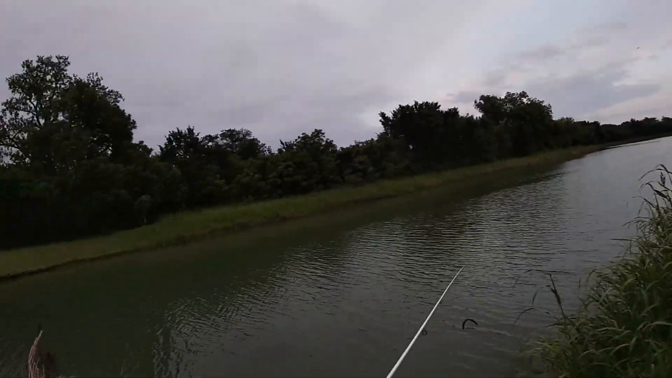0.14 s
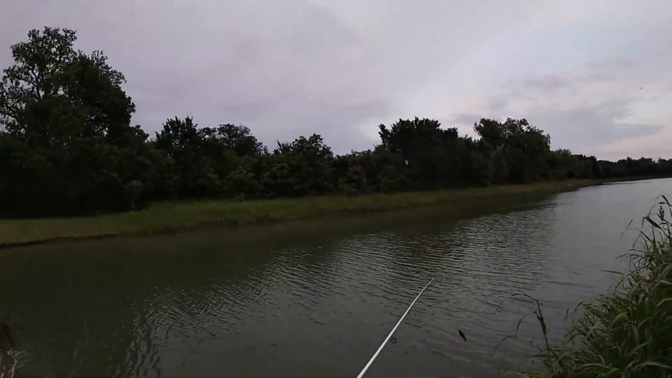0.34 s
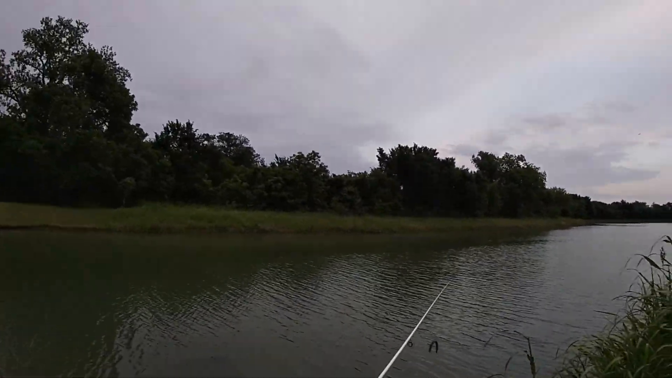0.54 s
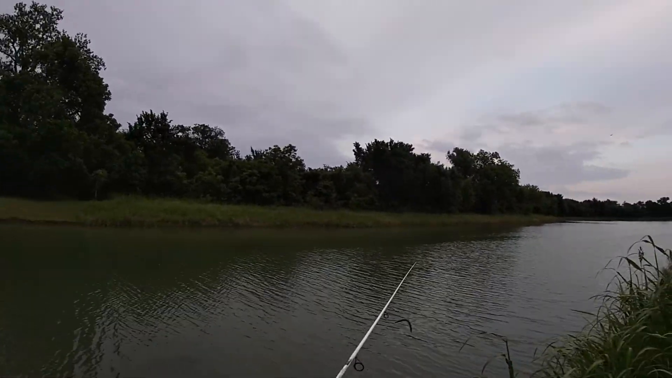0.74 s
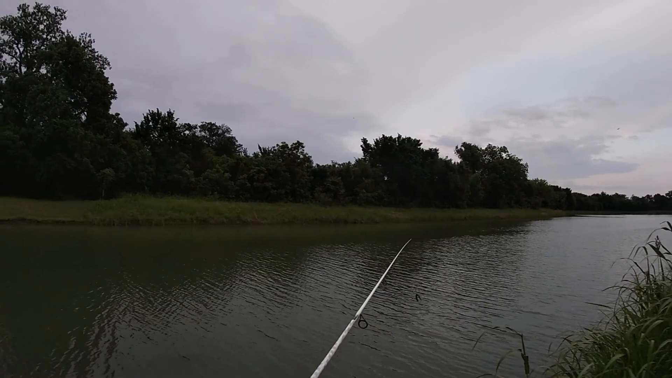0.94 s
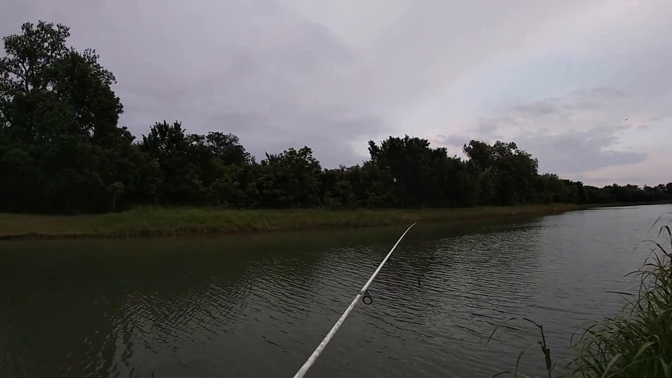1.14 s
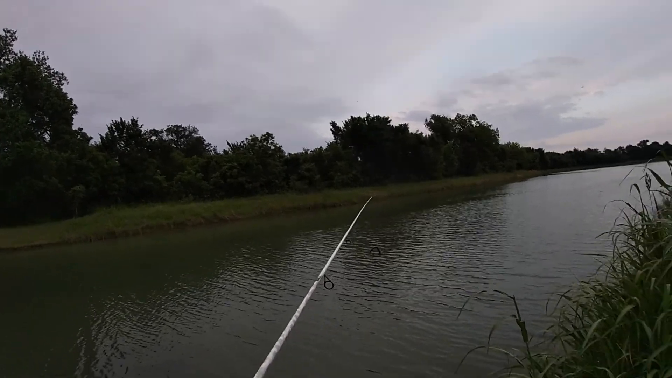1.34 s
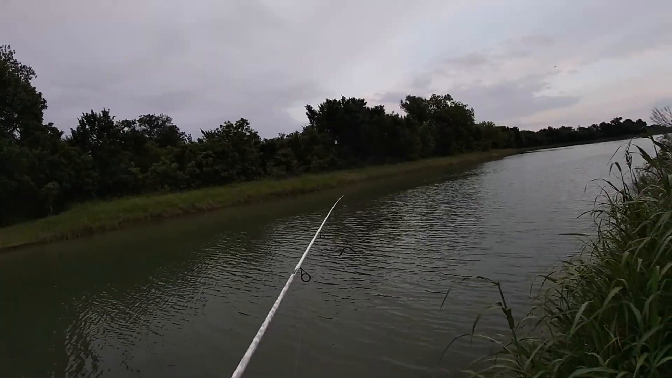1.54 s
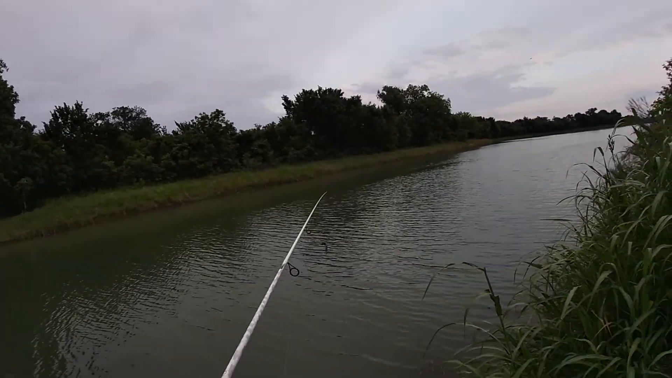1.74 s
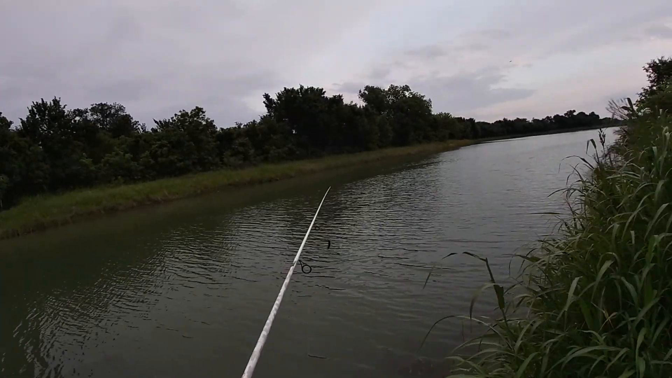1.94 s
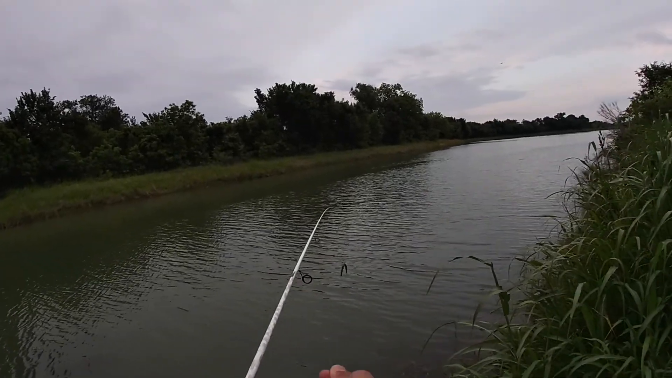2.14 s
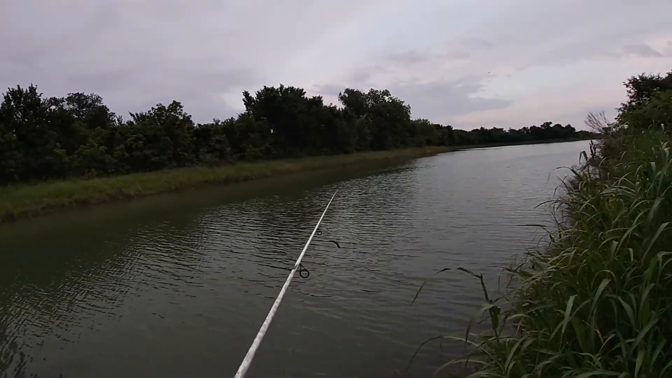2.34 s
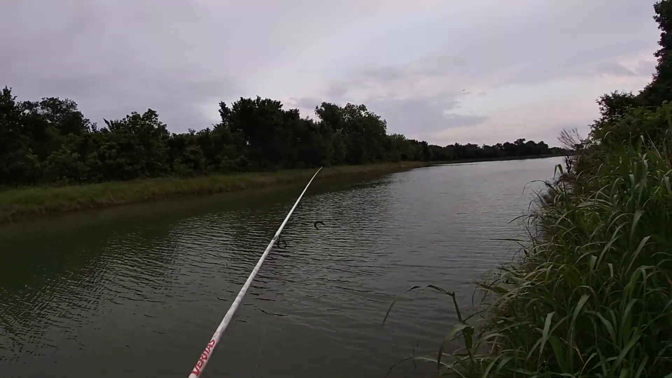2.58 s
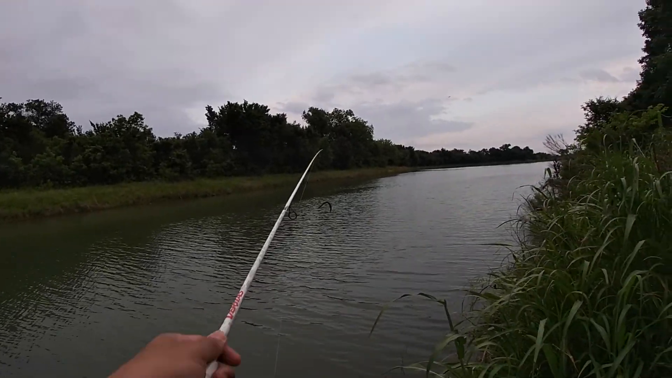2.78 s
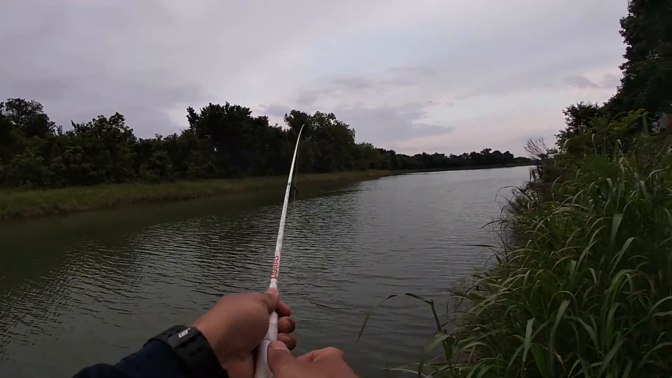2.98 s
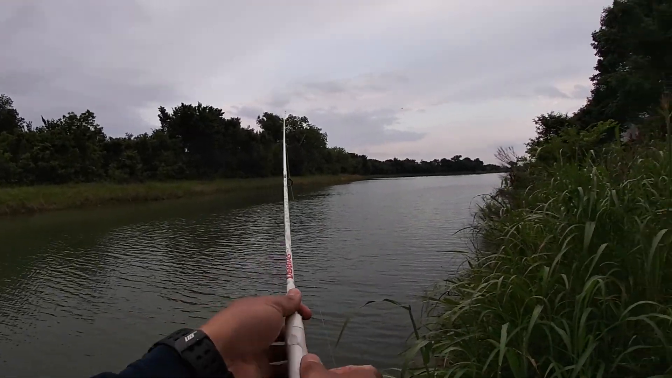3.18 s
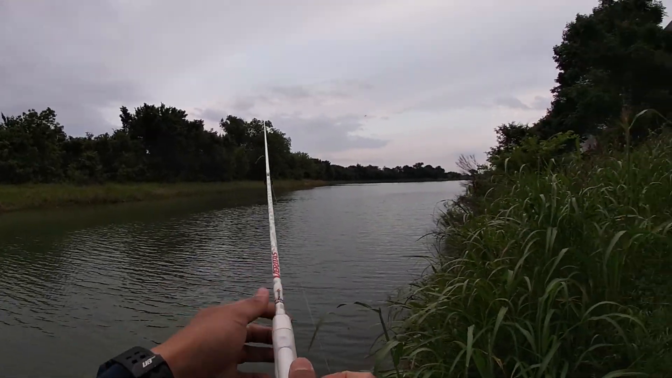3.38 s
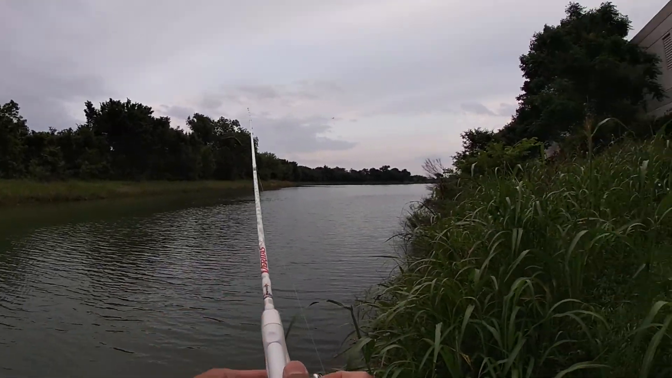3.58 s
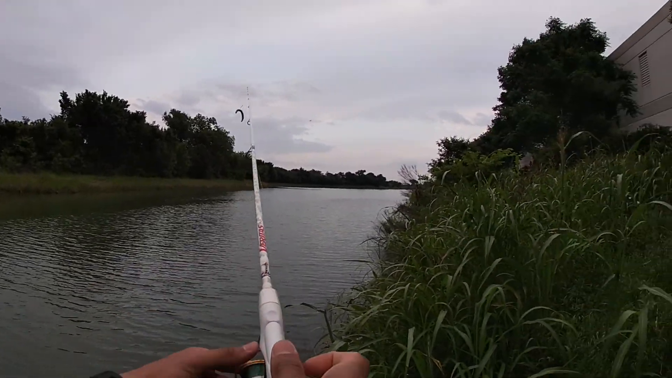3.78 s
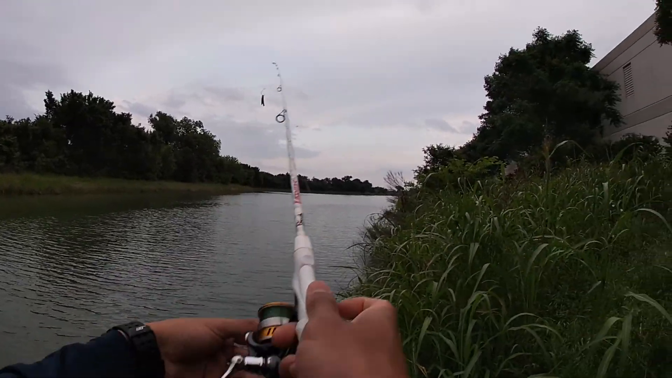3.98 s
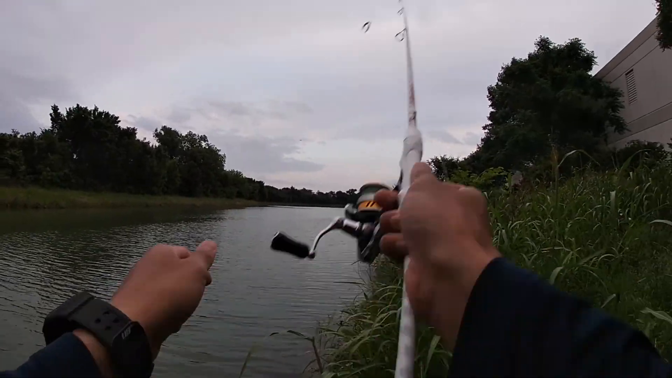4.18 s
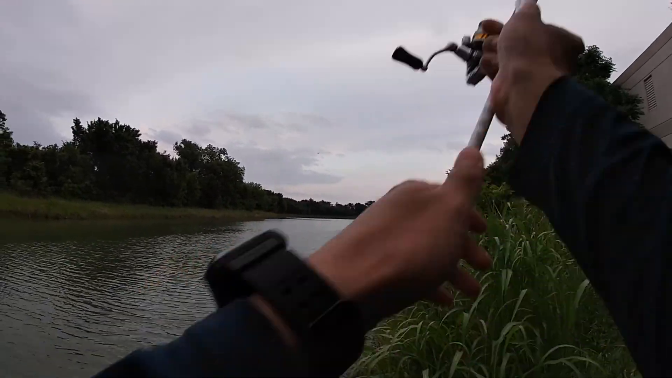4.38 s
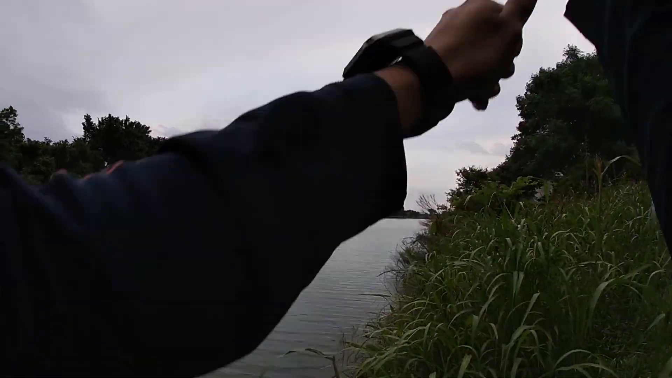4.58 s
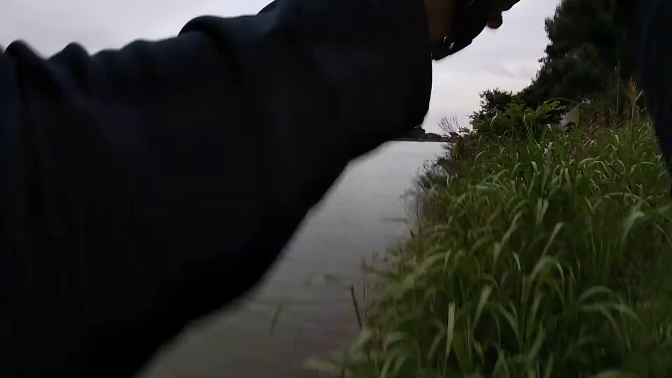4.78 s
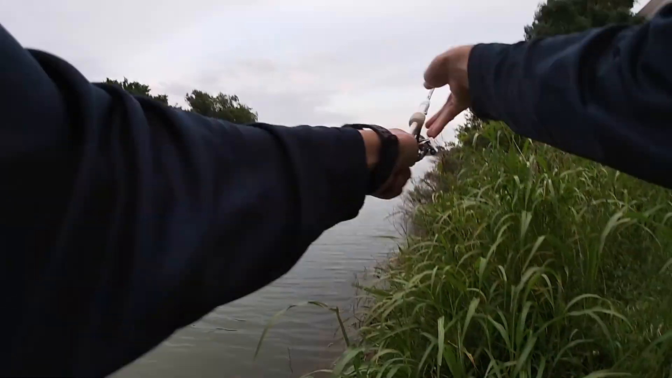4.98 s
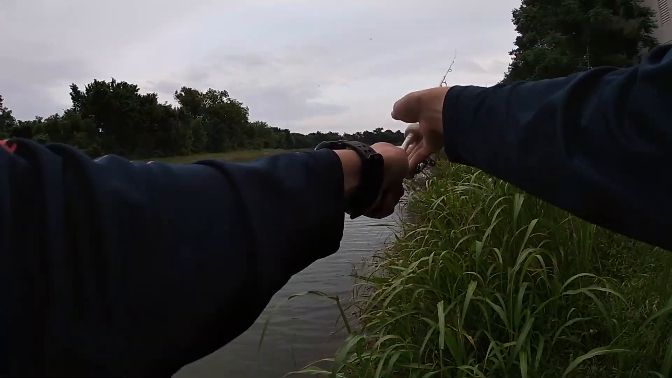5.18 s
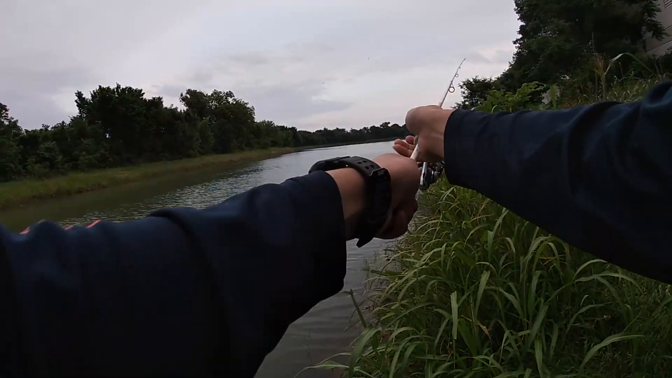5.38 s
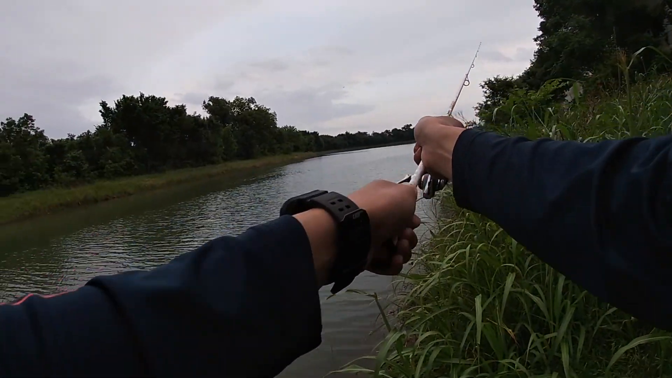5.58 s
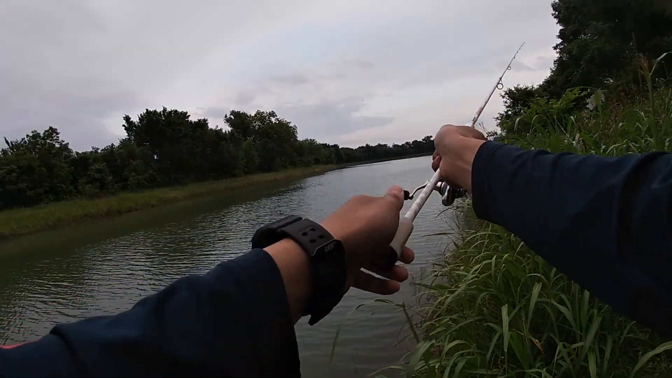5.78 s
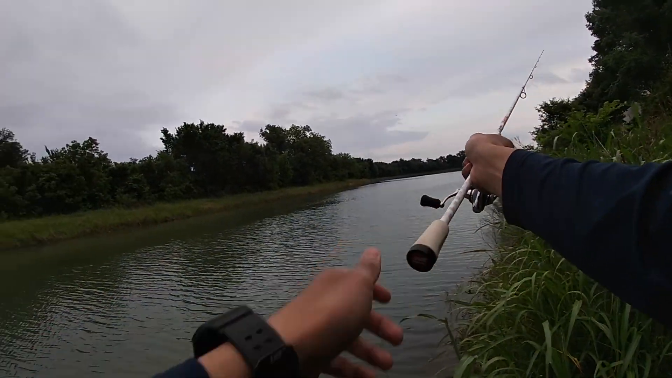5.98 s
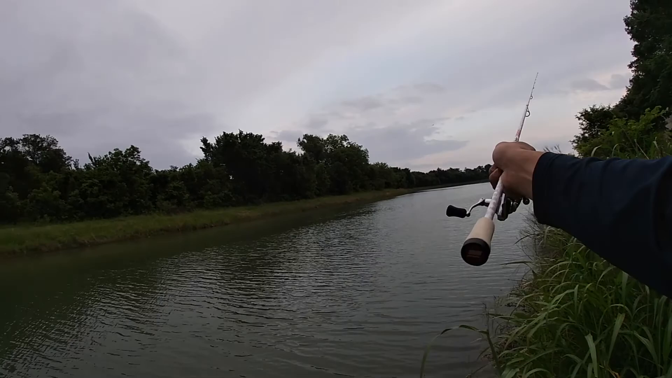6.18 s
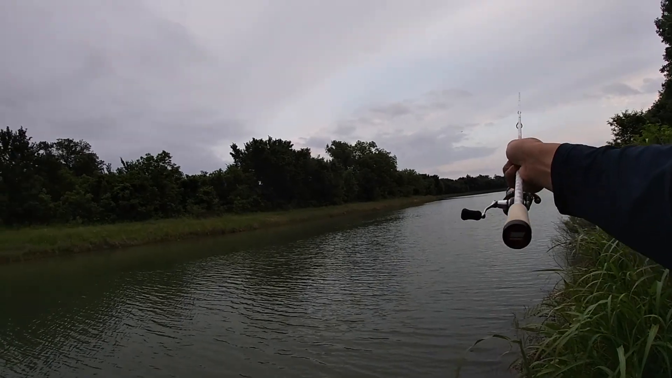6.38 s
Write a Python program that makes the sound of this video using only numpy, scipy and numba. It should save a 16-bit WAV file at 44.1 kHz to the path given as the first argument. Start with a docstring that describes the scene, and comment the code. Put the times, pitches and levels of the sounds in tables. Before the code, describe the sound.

A distant road rumbles steadily beside a canal, with faint engine hums and a few low wind puffs on a body-worn microphone. A fishing reel gives a quick run of small clicks, and sleeves rustle faintly. Late on, the cast shakes the microphone with a deep thump, the rod swishes, and line flutters off the spool, its thin whistle falling as it fades.

```python
"""A fishing rod cast from a grassy canal bank, heard by a chest-mounted camera.
A distant road rumbles, wind puffs on the microphone, sleeves rustle, and the reel clicks, whirrs
and squeaks. Then the throw shakes the camera mount, the rod swishes through the air and the line
hisses off the spool, slapping the rod rings coil by coil, its whistle falling as the lure slows."""
import sys
import numpy as np
from scipy import signal
from scipy.io import wavfile
from scipy.ndimage import uniform_filter1d
from numba import njit

SR = 44100
rng = np.random.default_rng(int(sys.argv[2]) if len(sys.argv) > 2 else 0)


def unload_audio(sound):
    """Save the sound as a 16-bit wav file, at the path given as the first command line argument."""
    columns = np.transpose(np.atleast_2d(sound))
    # keep every value between -1 and 1, then stretch to whole-number steps
    steps = np.round(np.clip(columns, -1, 1) * 32767)
    wavfile.write(sys.argv[1], SR, steps.astype(np.int16))


N = 283563


def undb(db):
    """Decibels to gain."""
    return np.exp(np.asarray(db) * (np.log(10) / 20))


def unit(x):
    """Scale to rms 1."""
    return x / np.sqrt(np.mean(x ** 2))


def curves(table):
    """Columns of a breakpoint table at every sample, and a soft gate over its span."""
    times, *columns = np.transpose(table)
    t = np.arange(N) / SR
    since_start = t - times[0] + (times[0] == 0)  # no fade at the scene's own edges
    until_end = times[-1] - t + (times[-1] > N / SR - .02)
    gate = np.clip(np.minimum(since_start, until_end) / .02, 0, 1)
    return [np.interp(t, times, column) for column in columns] + [gate]


def swell(peak_s, db, rise_db_s, fall_db_s, hold_s=0):
    """Envelope that climbs to db, holds and falls away, both slopes straight in dB."""
    t = np.arange(N) / SR - peak_s
    return undb(db + rise_db_s * np.minimum(t, 0) - fall_db_s * np.maximum(t - hold_s, 0))


@njit
def resonator(x, hz, width_hz):
    """State-variable band-pass with a moving centre, gain 1 at the centre."""
    out = np.empty(len(x))
    band_state, low_state, tuning, damping, last_hz = 0., 0., 0., 0., 0.
    for i in range(len(x)):
        if hz[i] != last_hz:
            last_hz = hz[i]
            tuning, damping = np.tan(np.pi * hz[i] / SR), width_hz / hz[i]
        ring = (band_state + tuning * (x[i] + 1e-18 - low_state)) / (1 + tuning * (tuning + damping))
        band_state = 2 * ring - band_state
        low_state += 2 * tuning * ring
        out[i] = damping * ring
    return out


def band(x, hz, width_hz):
    """Steep band-pass: the resonator applied twice."""
    hz = np.clip(hz + np.zeros(len(x)), 10, .45 * SR)
    return resonator(resonator(x, hz, float(width_hz)), hz, float(width_hz))


def noise_band(hz, width_hz):
    """Band of smooth noise at rms 1."""
    return unit(band(rng.standard_normal(N), hz, width_hz))


def wander(rate_hz):
    """Random steps, smoothed twice, at rms 1."""
    hold = int(SR / rate_hz)
    steps = np.repeat(rng.standard_normal(N // hold + 1), hold)
    return unit(uniform_filter1d(uniform_filter1d(steps, hold), hold)[:N])


def grit(scatter_db):
    """Grainy noise with uneven sample sizes, as from many tiny snaps."""
    return unit(rng.standard_normal(N) * undb(scatter_db * np.minimum(rng.exponential(size=N), 5.)))


def hiss(bands, scatter_db, flicker_db):
    """Grit through a set of resonances, each flickering alone."""
    return unit(sum(undb(db + flicker_db * wander(30)) * unit(band(grit(scatter_db), hz, width))
                    for hz, width, db in bands))


# Traffic swells; each level counts only against its own average:
# time_s, rumble_db, drone_db, low_roar_db, high_roar_db, tyre_hiss_db, thin_hiss_db
ROAD_SWELLS = [(0, -31.5, -30.5, -44.5, -50.5, -61, -59), (.65, -38, -31, -44, -51, -63.5, -60.5),
               (1.15, -34.5, -31, -41, -46, -58, -54), (1.7, -41, -32, -40, -46, -54.5, -53.5),
               (1.95, -40, -30, -35.5, -43.5, -57, -52.5), (2.5, -42.5, -29.5, -41, -43.5, -54, -52),
               (2.8, -37.5, -30, -38, -44, -52.5, -51), (3.05, -42, -32.5, -40, -46.5, -54, -56.5),
               (4.0, -40, -33.5, -40, -44.5, -53.5, -65.5), (4.3, -34.5, -33.5, -41, -44, -54.5, -53),
               (4.6, -40.5, -32, -39, -45, -53.5, -58), (4.9, -35.5, -36, -40, -45, -56, -57.5),
               (5.2, -40.5, -36, -40.5, -44, -55, -55.5), (5.5, -39, -37, -39, -44, -53, -59),
               (6.43, -40.5, -36, -40.5, -42, -51.5, -53.5)]
# The road's bass-heavy spectrum: frequency_hz, relative_density_db
ROAD_SPECTRUM = [(20, -8), (80, -2), (120, -2.5), (160, -0.5), (250, -7), (380, -13.5), (480, -9.5),
                 (700, -15.5), (1230, -20), (1600, -26), (2100, -34.5), (2700, -40.5), (3400, -69),
                 (6500, -84)]
def road(level_db=-30.5):
    """Third-octave bands of noise; rumble, drone, roar and hiss swell apart as vehicles come and go."""
    swells_db = np.array(curves(ROAD_SWELLS)[:-1])
    swells_db -= swells_db.mean(axis=1, keepdims=True)
    spectrum_hz, density_db = np.transpose(ROAD_SPECTRUM)
    crossovers_hz = [130, 420, 800, 1600, 2300]
    out = 0
    for hz in 20 * 2 ** np.arange(0, 8.7, 1 / 3):
        band_db = np.interp(np.log(hz), np.log(spectrum_hz), density_db) + 10 * np.log10(hz)
        swell_db = swells_db[np.searchsorted(crossovers_hz, hz)]
        out += undb(band_db + swell_db + .72 * wander(6)) * noise_band(hz, hz / 3)
    return undb(level_db) * unit(out)


def far_tone(table, width_hz):
    """A far tone: partly steady, partly scattered by the air into a narrow fluttering band."""
    hz, db, gate = curves(table)
    phase = 2 * np.pi * np.cumsum(hz + 3.512 * wander(22.01)) / SR
    steady = np.sqrt(2) * np.sin(phase + rng.uniform(0, 2 * np.pi))
    scattered = noise_band(hz, width_hz)
    return gate * undb(db + wander(18)) * (.63 * steady + .53 * scattered)


# Hum of a far engine drawing away: time_s, gain_db
ENGINE_HUM = [(0, -27.5), (.3, -37.5), (.48, -37), (.75, -36.5), (1.2, -29.5), (1.4, -36), (1.58, -26.5),
              (1.82, -37.5), (1.95, -36), (2.24, -43), (2.36, -32.5), (2.9, -33), (3.3, -37), (4.0, -37.5),
              (4.7, -36.5), (5.15, -45.5), (5.6, -36.5), (6.43, -43.5)]
# Tones of passing vehicles: start_s, length_s, start_pitch_hz, climb_hz_per_s, middle_gain_db
PASSING_TONES = [(1.39, 0.12, 472, -5.5, -38), (2.054, 0.62, 473.3, 0, -36.5), (2.795, 0.23, 484, 0, -43),
                 (1.999, 1.52, 312, 71.5, -41), (3.954, 0.77, 499, -7.5, -38.5),
                 (5.148, 0.74, 487.3, 30, -41), (5.4, 1.3, 337.8, 34.5, -43)]
# An engine revving up and letting off: time_s, pitch_hz, gain_db
ENGINE_REV = [(3.2, 197.4, -35), (3.5, 208.4, -30), (4.05, 225.3, -32), (4.35, 213.6, -32.5),
              (4.8, 178.3, -43)]
def vehicles(hum_hz=163.6, hum_sag_hz_s=3., edge_db=-3.5):
    """Far engines: a sagging hum, one rev, and passing tones that are softer at their ends."""
    hum = [(s, hum_hz - hum_sag_hz_s * s, db) for s, db in ENGINE_HUM]
    out = far_tone(hum, width_hz=35) + far_tone(ENGINE_REV, width_hz=9.5)
    for start_s, length_s, hz, climb, db in PASSING_TONES:
        arc = [(start_s + share * length_s, hz + climb * share * length_s, db + dip_db)
               for share, dip_db in [(0, edge_db), (.5, 0), (1, edge_db)]]
        out += far_tone(arc, width_hz=21)
    return out


# Wind bumping the microphone: peak_s, level_db, centre_hz
WIND_PUFFS = [(.02, -30, 50.6), (.23, -24.5, 85), (.45, -28.5, 34.8), (1.19, -32, 45), (1.27, -35, 60),
              (1.45, -28.5, 70), (2.1, -39, 50), (2.43, -31.5, 90.5), (2.77, -25.5, 55), (4.25, -35, 69.5),
              (4.98, -28, 22)]
def wind():
    """Each puff on the microphone is a short swell of deep noise."""
    return sum(swell(s, db, rise_db_s=297.5, fall_db_s=179) * noise_band(hz, 1.2 * hz)
               for s, db, hz in WIND_PUFFS)


# Faint bed of rustle: time_s, dull_db, bright_db
CLOTH_BED = [(0, -94.5, -104), (.6, -86, -96), (1.7, -70.5, -89), (2.4, -74.5, -94.5), (3.0, -76, -81.5),
             (3.8, -87, -78.5), (4.0, -73.5, -75), (4.7, -69.5, -68.5), (4.85, -64, -71), (5.3, -79, -62),
             (5.6, -67.5, -68.5), (6.1, -68.5, -71), (6.43, -68, -70.5)]
# Single rubs of cloth and grass: start_s, hold_s, dull_db, bright_db
CLOTH_RUBS = [(.235, 0.034, -68, -92), (.315, .03, -80, -92), (.37, .03, -74, -95), (.42, 0.039, -69, -88),
              (.8, 0.054, -78, -92.5), (1.15, 0.049, -75, -87.5), (1.43, 0.065, -76.5, -87.5),
              (1.87, 0.23, -75, -85), (2.47, 0.052, -73, -89), (2.7, 0.14, -67, -80),
              (3.559, 0.055, -75, -80.5), (3.9, .04, -73, -74), (4.3, 0.083, -66.5, -68.5),
              (4.42, .09, -74, -79)]
# Colour of the dull rustle: centre_hz, width_hz, gain_db
DULL_BANDS = [(3200, 2000, 8), (4500, 2100, 2.5), (5700, 1200, -8.5), (8000, 12000, -13), (11500, 7100, -7)]
# Colour of the bright sleeve hiss: centre_hz, width_hz, gain_db
BRIGHT_BANDS = [(8000, 2000, -1.5), (9900, 1200, -6), (6940, 6900, 0)]
def rustle(rise_db_s=1101, fall_db_s=133.5, snaps_per_s=60):
    """Fibres slip in small jerks that all bands share, with tiny snaps scattered on top."""
    dull_bed_db, bright_bed_db, _ = curves(CLOTH_BED)
    dull_gain, bright_gain = undb(dull_bed_db), undb(bright_bed_db)
    for start_s, hold_s, dull_db, bright_db in CLOTH_RUBS:
        dull_gain += swell(start_s, dull_db, rise_db_s, fall_db_s, hold_s)
        bright_gain += swell(start_s, bright_db, rise_db_s, fall_db_s, hold_s)
    jerks = undb(1.3 * wander(35))
    snaps = (rng.uniform(size=N) < snaps_per_s / SR) * undb(4 * rng.standard_normal(N))
    crackle = undb(-10.5) * dull_gain * unit(band(snaps, hz=4200, width_hz=3500))
    dull = dull_gain * hiss(DULL_BANDS, scatter_db=6.6, flicker_db=.88)
    bright = bright_gain * hiss(BRIGHT_BANDS, scatter_db=2.7, flicker_db=1.1)
    return crackle + jerks * (dull + bright)


def snap(rise_s):
    """A short burst of noise that swells and dies."""
    age = np.arange(int(.03 * SR)) / SR / rise_s
    return rng.standard_normal(len(age)) * age * np.exp(-age)


# Small ticks of tackle: start_s, peak_db, centre_hz, width_hz
TACKLE_TICKS = [(.139, -65, 4000, 2000), (.226, -64, 4000, 4000), (.315, -59, 3500, 2000),
                (.52, -64, 4500, 4000), (1.171, -59, 4500, 3000), (1.195, -50, 4000, 1200),
                (1.268, -55, 4000, 2000), (1.429, -57, 4500, 4000), (2.005, -58, 5600, 900),
                (2.028, -64, 10000, 4000), (2.18, -58, 5000, 3020), (2.222, -57, 3400, 1200),
                (2.476, -57, 5500, 3000), (2.533, -55, 5000, 4000), (3.074, -50, 6400, 3000),
                (3.163, -54, 8500, 4000), (3.912, -48, 8000, 4000), (3.918, -55, 9500, 6000),
                (3.982, -58, 9000, 6000), (4.048, -46, 4000, 3000), (4.055, -55, 8500, 4000),
                (4.078, -50, 5000, 5000), (4.114, -56, 9500, 3000), (4.121, -53, 6950, 5020),
                (4.362, -56, 10000, 6000), (4.415, -37, 6500, 6000), (4.752, -62, 11500, 4000),
                (4.545, -51, 9800, 2000), (4.786, -47, 8000, 8000), (4.802, -44, 6500, 3000),
                (4.829, -30, 1600, 1200), (5.093, -37, 2680, 500), (5.132, -43, 4300, 1200),
                (5.776, -59, 9000, 5040), (5.831, -55, 10000, 4000), (5.861, -59, 9500, 4000),
                (5.942, -53, 10000, 3000), (6.22, -44, 5000, 4000)]
# Clicks of the reel's pawl: start_s, peak_db
PAWL_CLICKS = [(2.0143, -39.5), (2.062, -42), (2.0971, -40.5), (2.129, -41), (2.1575, -41), (2.1684, -53)]
# Resonances of the reel body: centre_hz, width_hz, gain_db
REEL_MODES = [(4430, 280, -2.5), (5320, 400, -3), (5700, 500, -2), (6960, 480, 3.5), (9300, 720, -8),
              (10400, 1400, -3), (13000, 3000, -15), (4500, 3400, -9)]
def clicks():
    """Pawl clicks ring the reel body; tackle ticks each have one broad colour."""
    hits = [(s, db, REEL_MODES, snap(.00027) + .08 * snap(.0013)) for s, db in PAWL_CLICKS]
    hits += [(s, db, [(hz, width, 0)], snap(.0004)) for s, db, hz, width in TACKLE_TICKS]
    out = np.zeros(N)
    for start_s, peak_db, modes, strike in hits:
        hit = sum(undb(db) * unit(band(strike, hz, width)) for hz, width, db in modes)
        start = int(start_s * SR)
        out[start:start + len(hit)] += undb(peak_db) * hit / np.abs(hit).max()
    return out


# A brief turn of the reel handle: start_s, hold_s, level_db
HANDLE_TURNS = [(.89, 0.027, -84)]
def reel_whirr(centre_hz=5800):
    """Gear teeth blur into a narrow hiss, joined for a moment by a band nearly an octave up."""
    winding = swell(peak_s=2.2, db=-76, rise_db_s=25.5, fall_db_s=14)
    winding += sum(swell(s, db, 400, 300, hold_s) for s, hold_s, db in HANDLE_TURNS)
    glint = swell(peak_s=2.125, db=-82, rise_db_s=600, fall_db_s=600, hold_s=.055)
    gears = hiss([(centre_hz, 700, 0)], scatter_db=3.5, flicker_db=4.5)
    overtone = hiss([(1.89 * centre_hz, 700, 0)], scatter_db=2.2, flicker_db=1.6)
    return winding * gears + glint * overtone


def reel_squeak(pitch_hz=6050):
    """A short rough squeal from the reel, with a weaker pair of overtones."""
    noise = rng.standard_normal(N)
    envelope = swell(peak_s=3.878, db=-68, rise_db_s=3000, fall_db_s=90)
    choke = swell(peak_s=3.938, db=0, rise_db_s=0, fall_db_s=900)
    squeal = sum(gain * unit(band(noise, ratio * pitch_hz, width_hz))
                 for ratio, width_hz, gain in [(1, 700, 1), (1.87, 1200, .3), (2.1, 1600, .25)])
    return envelope * choke * squeal


def mount_shudder(start_s=4.795, length_s=.091, start_hz=24.6, climb_hz_s=30, grow_db_s=47):
    """The throw swings the camera mount, harder each time, until it stops short and trembles out."""
    t = np.arange(N) / SR - start_s
    hz = start_hz + climb_hz_s * np.clip(t, 0, length_s)
    phase = 2 * np.pi * (np.cumsum(hz) - np.sum(hz[t < 0])) / SR + .1
    swing = np.sin(phase) + .12 * np.sin(2 * phase + 3.4)  # slow back, snap forward
    stop_s = start_s + length_s
    onset = swell(start_s, db=-20.5, rise_db_s=970, fall_db_s=0)
    growth = swell(stop_s, db=grow_db_s * length_s, rise_db_s=grow_db_s, fall_db_s=700)
    tremble = swell(stop_s, db=-24, rise_db_s=890, fall_db_s=91)
    return np.sqrt(2) * (onset * growth + tremble) * swing


# Resonances of the camera's microphone port: centre_hz, width_hz, gain_db
PORT_MODES = [(4000, 3600, -1.5), (7700, 2800, 2.5), (9880, 1600, 0.5), (12800, 5600, -12)]
def camera_port(x):
    """The port colours a bright sound; neighbouring resonances swing opposite ways."""
    return unit(sum((-1) ** k * undb(db) * band(x, hz, width)
                    for k, (hz, width, db) in enumerate(PORT_MODES)))


# The rod loading, then whipping through:
# peak_s, hold_s, hiss_db, rush_above_hiss_db, rise_db_per_s, fall_db_per_s
ROD_STROKES = [(4.812, 0.011, -51, 1, 454, 250.), (4.89, .005, -58, 9.5, 200, 200.),
               (4.912, 0.014, -60, 10, 302, 72), (4.921, 0.0033, -46.5, -0.5, 1000., 450.)]
def rod_swish():
    """Turbulence behind the rod: a bright hiss above a lower rush."""
    bright = camera_port(grit(scatter_db=3.3))
    rush = noise_band(hz=1350, width_hz=1800)
    strokes = sum(swell(s, db, rise, fall, hold_s) * (bright + undb(rush_db) * rush)
                  for s, hold_s, db, rush_db, rise, fall in ROD_STROKES)
    return undb(2 * wander(89.88)) * strokes


RELEASE_S, SLOWS_AFTER_S = 4.908, .177  # the finger lets go; soon after, the lure loses speed
def coil_throb(fastest_hz=28.3, slowest_hz=12, slowing_hz_s=66):
    """Gain pulse of coils leaving the spool: each bites quickly, then slides away to a short gap."""
    t = np.arange(N) / SR - RELEASE_S
    coil_hz = np.clip(fastest_hz - slowing_hz_s * (t - SLOWS_AFTER_S), slowest_hz, fastest_hz)
    turn = np.cumsum(coil_hz * (t > 0)) / SR % 1
    bite = np.clip(turn / .07, .25, 1)
    return bite * undb(-11 * turn ** 5 + 1.2 * wander(110))


# Colour of line slapping the rod rings: starting_centre_hz, width_hz, gain_db
RING_BANDS = [(4000, 2000, -5.5), (7000, 960, -0.5), (8000, 2000, -2), (10200, 1400, 0), (13300, 4000, -9)]
def ring_slap(throb, slackens_s=5.16, slack_db=-5.5, fades_s=5.33):
    """Each coil slaps the rod rings once a turn, more softly when the line goes slack."""
    t = np.arange(N) / SR
    envelope = swell(RELEASE_S + .025, db=-49.5, rise_db_s=600, fall_db_s=20, hold_s=.11)
    envelope *= swell(fades_s, db=0, rise_db_s=0, fall_db_s=130)
    envelope *= undb(slack_db * np.clip((t - slackens_s) / .01, 0, 1))
    climb = 1 + .35 * np.clip(t - RELEASE_S - SLOWS_AFTER_S, 0, .3)  # the lower bands brighten
    bands = [(hz * climb if hz < 9000 else hz, width, db) for hz, width, db in RING_BANDS]
    return envelope * throb * hiss(bands, scatter_db=4.1, flicker_db=1.5)


# Whistle of the flying line: time_s, centre_hz, level_db, relative_sheen_db
WHISTLE_GLIDE = [(5.17, 11000, -72, 4), (5.3, 10400, -64, 7), (5.4, 9650, -55.5, -3),
                 (5.5, 8600, -52.5, -3), (5.59, 8100, -54, -9), (5.68, 7600, -55, -20),
                 (5.77, 7100, -61, -18), (5.83, 6600, -67, -18), (5.9, 6300, -80, -18)]
def line_whistle(throb):
    """The line whistles in the air, pulsing lightly with the coils and falling as the lure slows."""
    hz, level_db, sheen_db, gate = curves(WHISTLE_GLIDE)
    bands = [(hz, 2000, 0), (1.11 * hz, 1500, -5), (1.22 * hz, 5000, sheen_db)]
    air = hiss(bands, scatter_db=3.8, flicker_db=1.5)
    return gate * undb(level_db + 1.3 * wander(70)) * throb ** .17 * air


def scene():
    """Background, tackle handling and the cast, mixed in mono."""
    background = road() + vehicles() + wind()
    handling = rustle() + clicks() + reel_whirr() + reel_squeak()
    throw = mount_shudder() + rod_swish()
    throb = coil_throb()
    line = ring_slap(throb) + line_whistle(throb)
    return (background + handling + throw + line)[None]


def record(dry):
    """The camera's housing dulls the highest treble and the recorder cuts the top."""
    dull_hz, top_hz = 12500, 15000
    dulled = signal.lfilter(*signal.butter(2, dull_hz, fs=SR), dry)
    return signal.sosfilt(signal.ellip(8, .2, 70, top_hz, fs=SR, output="sos"), dulled)


dry = scene()
out = record(dry)
unload_audio(out)
```